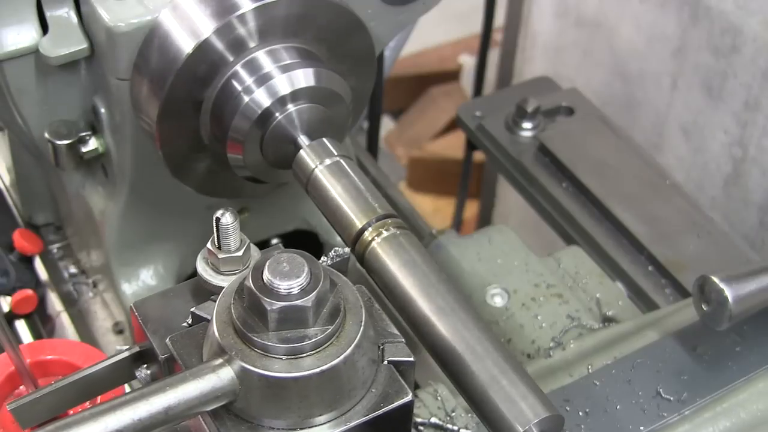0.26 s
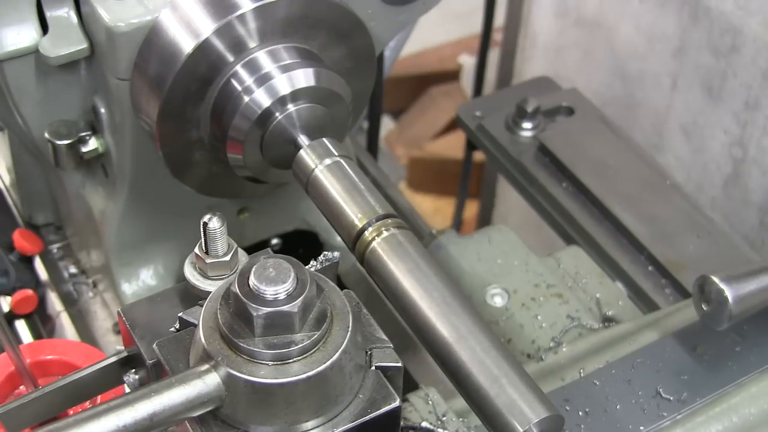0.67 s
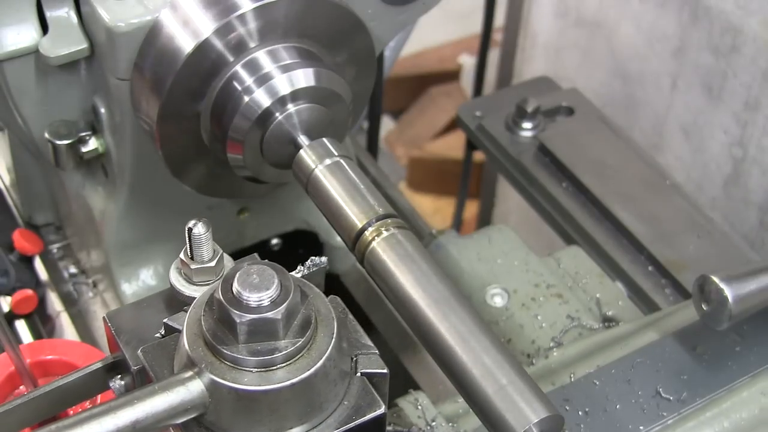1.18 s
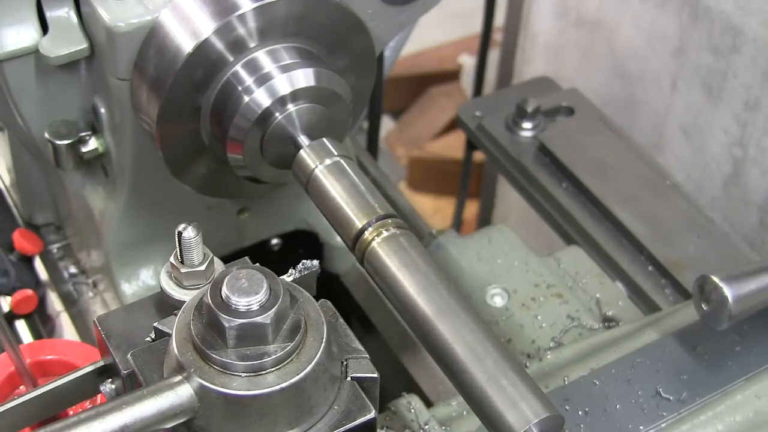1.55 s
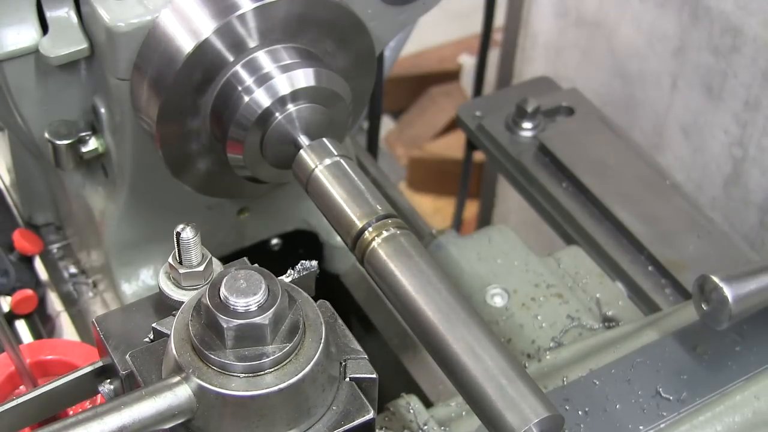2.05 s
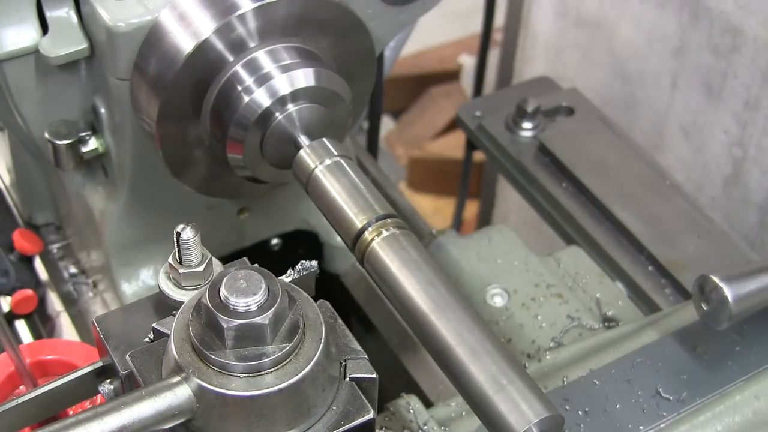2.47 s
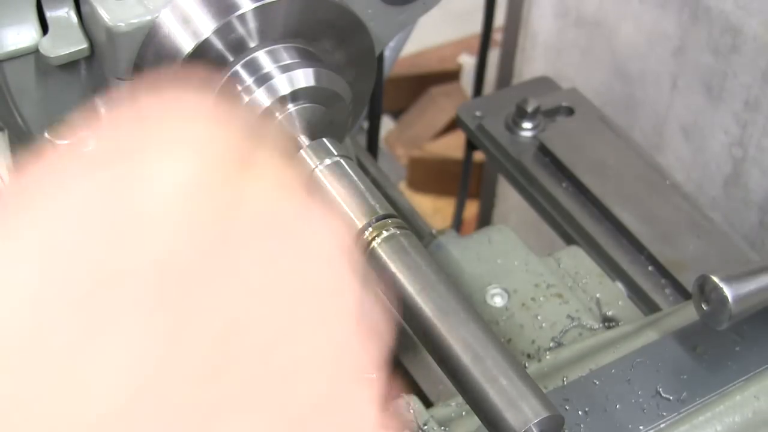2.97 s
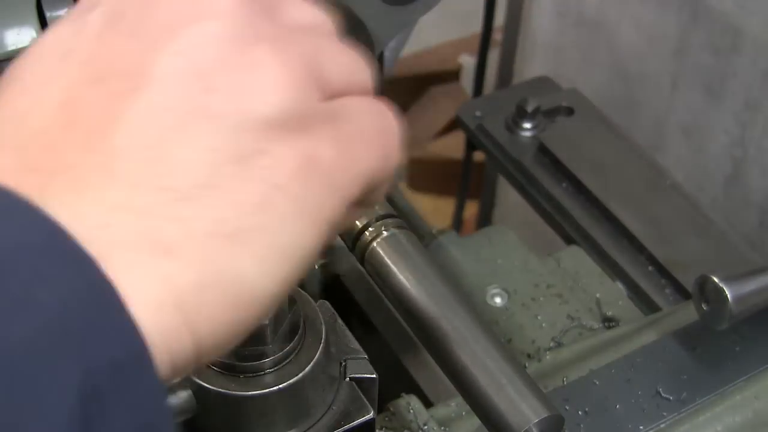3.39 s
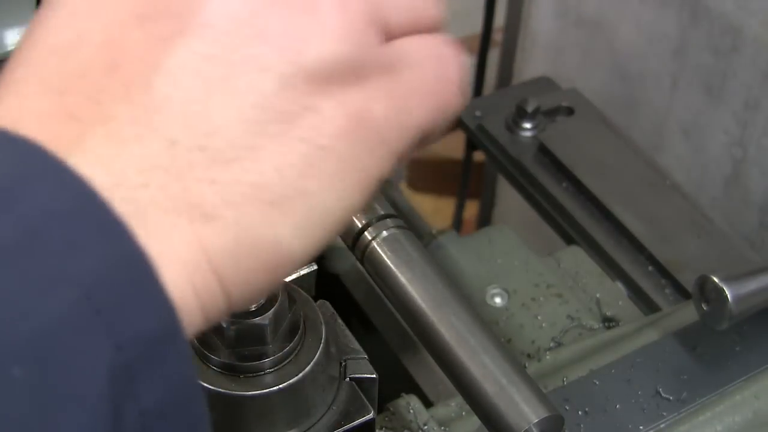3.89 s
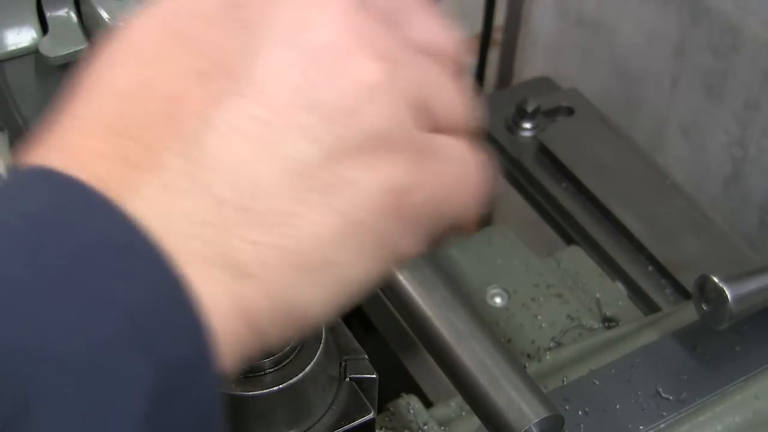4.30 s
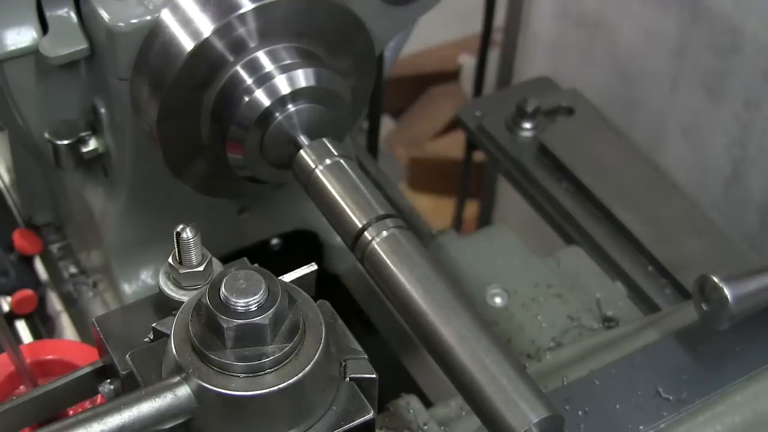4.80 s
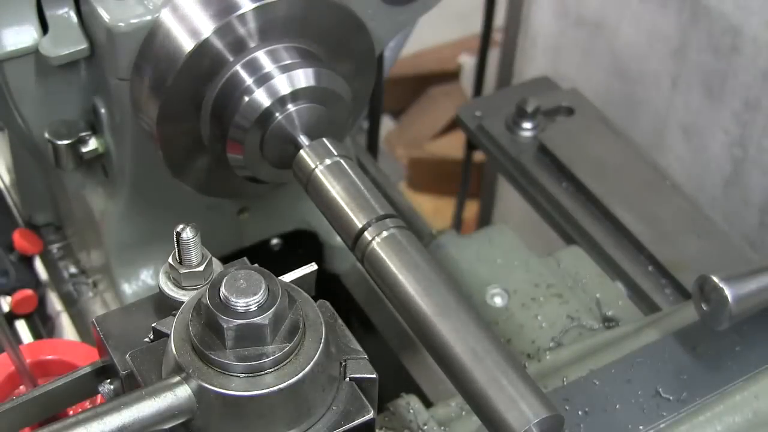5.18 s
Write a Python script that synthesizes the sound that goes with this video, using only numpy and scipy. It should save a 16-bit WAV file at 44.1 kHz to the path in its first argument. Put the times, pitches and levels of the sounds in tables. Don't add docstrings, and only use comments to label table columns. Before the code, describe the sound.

A metal lathe runs continuously in a small workshop, heard close up: a rough low-mid roar of motor and gearbox, fuzzy gear tones and a resonant casing. From the very start, loud, dry, shrill squeaks cut across it, mostly 0.03 to 0.09 seconds long, with abrupt edges, rapid judder and pitch rocking around five to six kilohertz. They come irregularly, several per second, right to the end at about 5.4 seconds. Thinner, higher squeals near eight kilohertz appear around 0.8, 2.1 and 2.8, then more often from 3.3 to 4.4, with tiny chirps between; one is strong near 4.2. Where both overlap, the tone turns harsher. Steel rings and a short room tail follows. The machine bed ducks under squeaks and swells in gaps, thinnest around 1.7, fuller after 3. Soft dull casing knocks occur sporadically, clearest near 4.9. Peaks are tightly limited.

```python
import sys
import numpy as np
from scipy import signal
from scipy.fft import rfft, irfft, next_fast_len
from scipy.io import wavfile
from scipy.ndimage import uniform_filter1d, minimum_filter1d, map_coordinates

SR = 44100
rng = np.random.default_rng(int(sys.argv[2]) if len(sys.argv) > 2 else 0)


def nominal_scale(level):
    x = np.asarray(level, float) / 20
    return 10 ** x


def digitize_waveform(pressure):
    field = np.atleast_2d(pressure).T
    bounded = np.clip(field, -1, 1)
    quanta = np.round(bounded * 32767).astype(np.int16)
    wavfile.write(sys.argv[1], SR, quanta)


N = 240331
TIME = np.arange(N) / SR

# centre_hz, width_hz, level_db
CASING_MODES = [(132.4, 8.1, -9), (607.5, 17, -3), (808, 46, -6.5), (1142, 18, -3.5), (1907, 47, -7.5),
                (2335, 30, -14)]


def contact():
    # start_s, end_s, depth (share of judder)
    ragged = [
        (.15, .172, 0.26),
        (.295, 0.37, 1.1),
        (1.09, 1.14, 1.22),
        (1.435, 1.46, 0.86),
        (2.19, 2.23, 0.34),
        (4.44, 4.464, 1.92),
        (2.85, 2.875, 0.99),
        (1.575, 1.61, 0.89),
        (1.848, 1.856, .8),
        (4.745, 4.772, 0.43),
    ]
    # freq_hz, gain_db
    radiation = [(2000, -2.5), (2700, 1.5), (3300, -4), (3800, 0), (4300, -4), (4800, -2.5), (6200, 2.5),
                 (7200, -19.5), (7900, 1), (12000, -6.5), (13000, -15), (15500, -7)]
    # freq_hz, density_db (per Hz)
    scrape_spectrum = [(2500, -10.5), (3800, -19), (4500, -5), (7000, -23), (7900, -15), (9000, -19),
                       (12700, -30), (13300, -13), (13900, -39), (15600, -27)]
    # centre_hz, width_hz, level_db
    steel = [(3757, 21, 6), (4906, 24, -9), (5900, 24, -13), (7850, 40, -14), (8160, 13, -47),
             (12300, 30, -14)]
    # centre_hz, width_hz, level_db
    bracket = [(2685, 24, 3)]

    low = squeal(low_bursts(), judder_hz=148.8, swing=0.024, flutter_db=1.65, octave_db=-14.0,
                 third_db=-32, rise_s=0.00053, fall_s=0.0022, sag=0.04, rough_db=-28, ragged=ragged)
    high = squeal(high_bursts(), judder_hz=166, swing=0.014, flutter_db=1.1, octave_db=-29,
                  third_db=-84, rise_s=0.0023, fall_s=0.0015, sag=0.00345, rough_db=-31.5)
    high = high + blips()
    product = nominal_scale(-5.0) * low * high
    both = filtered(low + high + product, lambda f: nominal_scale(along(radiation, f)))
    pressure = np.sqrt(np.abs(uniform_filter1d(both ** 2, size=90)))
    grains = pressure * nominal_scale(-37.0 + 4.5 * np.tanh(wobble(70))) * rng.standard_normal(N)
    scrape = filtered(grains, lambda f: nominal_scale(along(scrape_spectrum, f) + 14.5))
    return both + scrape + filtered(both, modes(steel)) + filtered(both, modes(bracket))


def low_bursts():
    # start_s, length_s, crest_s (after start), centre_hz, swing_hz
    stroke_rows = [(0.095, 0.074, 0.049, 5470, 275), (0.288, 0.037, 0.0068, 5220, 318),
                   (0.402, 0.066, 0.05, 5255, 540), (0.591, 0.047, 0.02, 5130, 540),
                   (0.883, 0.067, 0.047, 5170, 530), (1.063, 0.052, 0.02, 5550, 119.2),
                   (1.353, 0.083, 0.05, 5465, 370), (1.539, 0.08, 0.0058, 5446, 298),
                   (1.849, 0.052, 0.035, 5425, 410), (2.148, 0.081, 0.042, 5345, 430),
                   (2.47, 0.078, 0.039, 5435, 350), (2.945, 0.073, 0.043, 5540, 453),
                   (3.107, 0.075, 0.035, 5335, 430), (3.572, 0.08, 0.04, 5487, 430),
                   (3.89, 0.07, 0.045, 5450, 331.5), (4.066, 0.06, 0.022, 5313, 510),
                   (4.196, 0.078, 0.055, 5470, 471), (4.436, 0.049, 0.044, 5640, 459),
                   (4.527, 0.081, 0.035, 5520, 440), (4.688, 0.087, 0.029, 5370, 490),
                   (5.009, 0.058, 0.021, 5427, 370), (5.168, 0.047, 0.04, 5706, 190),
                   (5.381, 0.027, 0.049, 5850, 913)]
    # start_s, length_s, crest_s (after start), centre_hz, level_db
    catch_rows = [(0, 0.034, 0.049, 5830, -6.5), (0.331, 0.023, 0.021, 5515, -9.5),
                  (0.467, 0.029, 0.052, 5740, -10), (0.804, 0.0063, 0.06, 5214, -11),
                  (1.127, 0.027, 0.04, 6060, -8.5), (1.268, 0.045, 0.06, 6390, -11.5),
                  (1.436, 0.024, 0.046, 6070, -9.5), (2.551, 0.021, 0.021, 5710, -7.5),
                  (2.85, 0.027, 0.038, 5400, -14.5), (3.317, 0.0075, 0.074, 5280, -15.5),
                  (3.808, 0.016, 0.038, 5570, -11), (4.517, 0.0041, 0.052, 4694, -16),
                  (5.081, 0.0099, 0.045, 5320, -20), (5.089, 0.013, 0.066, 6300, -17.5)]
    shared = dict(rock_s=0.077, knee_hz=4870, db_per_khz=-3.5)
    strokes = [burst(*row, db=-6, bite=0.04, fade_db=5, edge_db=2.55, **shared) for row in stroke_rows]
    catches = [burst(*row[:4], swing_hz=430, db=row[4], bite=0, fade_db=0, edge_db=0, **shared)
               for row in catch_rows]
    return sorted(strokes + catches, key=lambda b: b[0][0])


def high_bursts():
    # start_s, length_s, crest_s (after start), centre_hz, level_db
    high_rows = [(0.761, .052, 0.097, 8200, -10.5), (2.066, 0.047, .06, 8480, -11),
                 (2.385, 0.023, 0.0046, 8220, -20), (2.817, 0.05, 0.094, 8320, -8),
                 (2.872, 0.02, 0.041, 8750, -17.5), (3.279, 0.045, 0.098, 8730, -7),
                 (3.447, .073, .1, 8350, -7), (3.665, .023, 0.082, 9300, -15.5),
                 (3.757, .066, .1, 8250, -3.5), (4.145, 0.025, 0.054, 8870, -16.5),
                 (4.387, 0.053, .094, 8280, -5.5), (4.857, 0.02, 0.042, 8450, -22.5)]
    return [burst(*row[:4], swing_hz=521, db=row[4] - 2, rock_s=0.12, bite=0.01, knee_hz=8750,
                  db_per_khz=-8, fade_db=1.5, edge_db=6.5) for row in high_rows]


def burst(start_s, length_s, crest_s, hz, swing_hz, db, rock_s, bite, knee_hz, db_per_khz, fade_db, edge_db):
    snag_spacing_s, snag_hz, snag_db = 0.0045, 125, 2.6
    bite_s = 0.0033
    flat_crest = 0.12
    snag = rng.standard_normal((2, 30))
    u = np.linspace(0, 1, num=int(np.clip(length_s / snag_spacing_s, 2, 28)) + 2)
    after_s = u * length_s
    turn = 2 * np.pi * (after_s - crest_s) / rock_s
    rocked_hz = hz + swing_hz * (np.cos(turn) - flat_crest * np.cos(2 * turn))
    pitch_hz = rocked_hz * (1 + bite * np.exp(-after_s / bite_s)) + snag_hz * snag[0, :len(u)]
    climb_db = db_per_khz * np.maximum(rocked_hz - knee_hz, 0) / 1000
    shape_db = -fade_db * u - edge_db * (2 * u - 1) ** 4
    level_db = db + climb_db + shape_db + snag_db * snag[1, :len(u)]
    return np.transpose([start_s + after_s, pitch_hz, level_db])


def squeal(bursts, judder_hz, swing, flutter_db, octave_db, third_db, rise_s, fall_s, sag, rough_db, ragged=()):
    s, hz, db = np.transpose([row for b in bursts for row in b])
    gate, letting_go = np.zeros(N), np.zeros(N)
    for b in bursts:
        first_s, last_s = b[0][0], b[-1][0]
        gate += np.interp(TIME, [first_s - rise_s, first_s, last_s, last_s + fall_s], [0, 1, 1, 0]) ** 2
        letting_go += np.exp(-((TIME - last_s - fall_s) / 0.0052) ** 2)
    cycle = 2 * np.pi * np.cumsum(judder_hz * (1 + 0.2 * wobble(60))) / SR
    judder = (np.sin(cycle) + 0.64 * np.sin(2 * cycle)) * (1 + 0.44 * wobble(50)) + 0.48 * wobble(420)
    stutter = sum(depth * np.interp(TIME, [a - 0.003, a, b, b + 0.0025], [0, 1, 1, 0])
                  for a, b, depth in ragged)
    bend = 1 + swing * (1 + stutter) * judder - sag * letting_go
    phase = 2 * np.pi * np.cumsum(np.interp(TIME, s, hz) * bend) / SR
    level_db = np.interp(TIME, s, db) + 5.0 + flutter_db * wobble(330) + 2.7 * stutter * np.cos(cycle)
    octave = nominal_scale(octave_db + 3.04 * wobble(250)) * np.sin(2 * phase)
    third = nominal_scale(third_db + 3.4 * wobble(52)) * np.sin(3 * phase)
    grit = nominal_scale(rough_db + 20 * letting_go) * wobble(3000)
    return gate * nominal_scale(level_db) * (1 + grit) * (np.sin(phase) + octave + third)


def blips(rise_s=0.0025, fall_s=0.0014, glide=0.039):
    # start_s, peak_db, pitch_hz
    blip_rows = [(0.2835, -4.5, 8050), (0.3631, -20, 8990), (0.3974, -29, 9320), (0.536, -13, 8500),
                 (1.0625, -12, 8050), (1.3499, -12.5, 7850), (1.8472, -34, 7970), (2.0197, -33, 9180),
                 (4.1917, 0.5, 7780), (4.6292, -20, 9140), (4.684, -20, 7860), (5.009, -18, 8060),
                 (2.807, -14, 8110), (5.096, -17, 8300), (5.38, -10.5, 7930)]
    out, t = np.zeros(N + SR), np.arange(-600, 600) / SR
    swell = np.where(t < 0, np.exp(t / rise_s), np.exp(-(t / fall_s) ** 2))
    for s, db, hz in blip_rows:
        tone = np.sin(2 * np.pi * hz * (t - glide * t ** 2 / 0.01))
        out[round((s + 0.004) * SR) - 600:][:len(t)] += nominal_scale(db) * swell * tone
    return out[:N]


def machine():
    # freq_hz, density_db (per Hz)
    roar_spectrum = [(40, -53), (90, -33), (130, -8), (180, -17.5), (270, -8), (450, -15), (700, -16),
                     (1450, -15.5), (1700, -23.5), (3000, -26.5), (5500, -25), (7300, -35), (12300, -55),
                     (13200, -78)]
    # pitch_hz, wander_hz, level_db (over the roar)
    gear_tones = [(238.6, 3.3, -12.5), (262.2, 2.8, -13), (363, 9.6, -12), (393, 6.1, -14.5),
                  (435.5, 13.5, -6.5), (472, 1.9, -12.5), (540, 8.2, -5.5), (1091, 1.6, -15),
                  (1240, 3.7, -16), (1320, 2.1, -13)]
    roar = unit(filtered(patchy(3.2), lambda f: nominal_scale(along(roar_spectrum, f))))
    rattle = rng.standard_normal(N) * nominal_scale(0.66 * wobble(35) + 3.53 * wobble(140))
    casing = unit(filtered(rattle, modes(CASING_MODES)))
    gears = np.zeros(N)
    for hz, wander_hz, db in gear_tones:
        tone = filtered(rng.standard_normal(N), lambda f: 1 / (1 + ((f - hz) / wander_hz) ** 2))
        gears += nominal_scale(db) * unit(tone)
    return nominal_scale(-2.5 + 0.57 * wobble(25.05)) * roar + nominal_scale(-8) * casing + gears


def patchy(depth_db):
    z = signal.stft(rng.standard_normal(N + 512), nperseg=512)[2]
    field = uniform_filter1d(rng.standard_normal(z.shape), size=5, axis=0)
    field = uniform_filter1d(field, size=9, axis=1)
    return signal.istft(z * nominal_scale(depth_db * unit(field)), nperseg=512)[1][:N]


def knocks(t60_s=0.11):
    # start_s, peak_db
    knock_rows = [(.229, -24), (.63, -27), (.894, -31), (1.263, -34), (1.338, -31), (1.741, -23),
                  (2.005, -28), (2.447, -27), (3.558, -23), (4.225, -29), (4.668, -27), (4.892, -19),
                  (5.112, -26), (5.334, -21)]
    out, t = np.zeros(N + SR), np.arange(SR // 8) / SR
    for s, db in knock_rows:
        out[round(s * SR):][:len(t)] += nominal_scale(db - 60 * t / t60_s) * rng.standard_normal(len(t))
    dull = filtered(out[:N], lambda f: 1 / (1 + 1j * f / 1500) ** 3 * (f > 200))
    return nominal_scale(15.5) * dull + nominal_scale(14) * filtered(out[:N], modes(CASING_MODES))


def shop(x):
    # freq_hz, t60_s
    decay = [(200, .5), (2500, 0.25), (4500, 0.41), (6000, 0.39), (9000, 0.22), (14000, 0.39)]
    hz, t, z = signal.stft(rng.standard_normal(SR), SR, nperseg=256)
    fading = z * nominal_scale(-60 * t / along(decay, hz)[:, None])
    tail = signal.istft(fading, SR, nperseg=256)[1]
    return signal.fftconvolve(np.pad(x, (300, 0)), tail / np.linalg.norm(tail))[:N]


def ducking(x, release_s=0.029, lag_s=0.0033):
    heard = filtered(x, lambda f: np.where(f < 7000, 1, 0.25))
    loud = np.clip(uniform_filter1d(np.abs(heard), size=130) / 0.51, 0, 1)
    keep, slow = np.exp(-1 / (release_s * SR)), np.exp(-1 / (lag_s * SR))
    releasing = signal.lfilter([1 - keep], [1, -keep], 4.0 * loud).clip(0, 1)
    held = np.maximum(loud, releasing)
    return signal.lfilter([1 - slow], [1, -slow], held)


def unit(x):
    return x / np.sqrt(np.mean(x ** 2) + 1e-20)


def along(points, hz):
    f, v = np.transpose(points)
    return np.interp(np.log(hz + 1), np.log(f + 1), v)


def wobble(rate_hz):
    return map_coordinates(rng.standard_normal(int(N * rate_hz / SR) + 4), [TIME * rate_hz])


def filtered(x, response):
    m = next_fast_len(N + SR // 2)
    return irfft(rfft(x, m) * response(np.fft.rfftfreq(m, 1 / SR)), m)[..., :N]


def modes(table):
    def response(f):
        return sum((-1) ** k * nominal_scale(db) * 1j * f * w / (c * c - f * f + 1j * f * w)
                   for k, (c, w, db) in enumerate(table))
    return response


def scene():
    # delay_s, level_db
    early = [(.0011, -95), (.0027, -13.5), (.0046, -13), (.0071, -38), (0.0098, -20.5), (0.015, -25.5)]
    # time_s, level_db
    open_gain = [(0, -23), (.25, -24.5), (.6, -28.5), (1.1, -30.5), (1.66, -34.5), (2.0, -31.5),
                 (2.42, -27.5), (2.68, -27.5), (3.1, -20.5), (3.3, -20.5), (3.43, -20), (3.53, -27),
                 (3.75, -22), (4.05, -20.5), (4.35, -19.5), (4.7, -24.5), (4.92, -20.5), (5.35, -19.5)]
    pressed_db = -32.5
    squeak = contact()
    echoes = sum(nominal_scale(db) * np.pad(squeak, (round(s * SR), 0))[:N] for s, db in early)
    open_db = np.interp(TIME, *np.transpose(open_gain))
    gain_db = open_db - ducking(squeak) * np.maximum(open_db - pressed_db, 0)
    tail = nominal_scale(-18.5 + 0.89 * (gain_db + 30.5)) * shop(squeak)
    return (squeak + echoes + tail + nominal_scale(gain_db) * machine() + knocks())[None]


def top_cut(x):
    return signal.sosfilt(signal.butter(12, 15970, fs=SR, output="sos"), x)


def record(dry):
    need = np.minimum(1, 0.84 / (np.abs(dry) + 1e-9))
    x = dry * uniform_filter1d(minimum_filter1d(need, size=91), size=61)
    x = x + nominal_scale(-46) * x ** 2
    x = filtered(x, lambda f: (f < 15780) * f / (f + 15 / 1j))
    return top_cut(x)


dry = scene()
out = record(dry)
digitize_waveform(out)
```